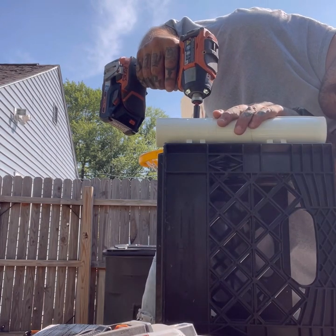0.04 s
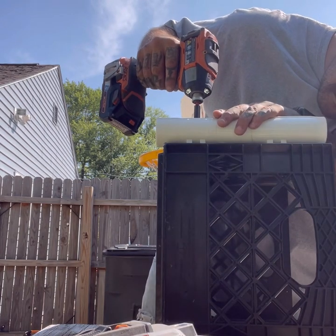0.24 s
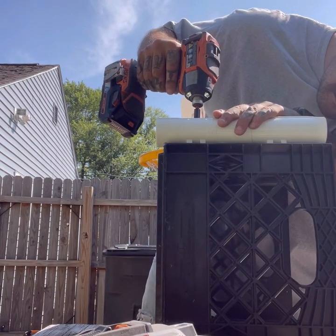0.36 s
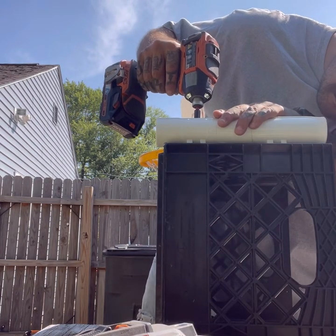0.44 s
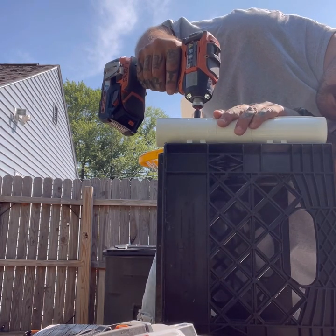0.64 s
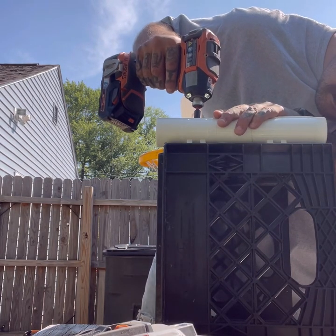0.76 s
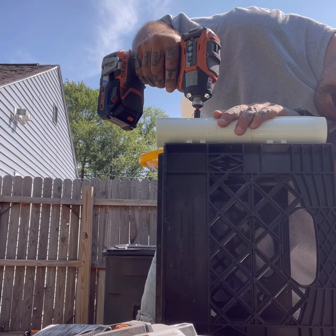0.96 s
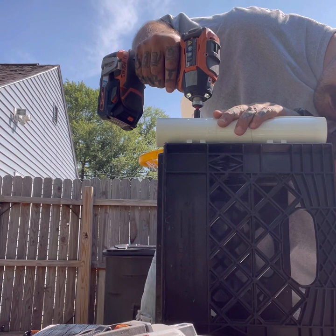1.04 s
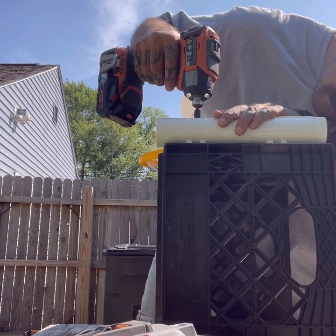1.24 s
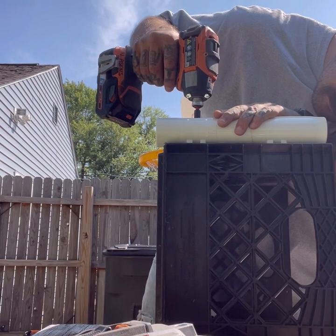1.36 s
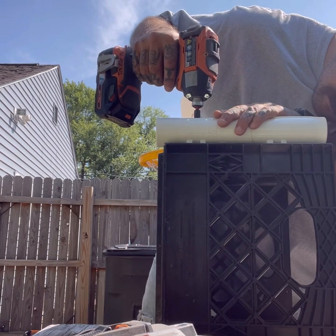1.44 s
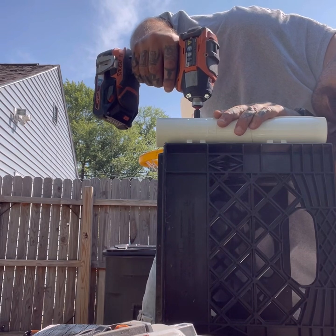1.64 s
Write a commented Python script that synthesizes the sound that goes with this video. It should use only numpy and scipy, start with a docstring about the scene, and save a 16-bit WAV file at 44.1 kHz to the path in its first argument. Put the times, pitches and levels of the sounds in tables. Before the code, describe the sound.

Sharp ticks and knocks of an idle drill's bit on plastic pipe atop a crate.

```python
"""Quick ticks and a short skid on plastic, then two more knocks: the bit of a cordless drill, its
motor off, is set on a plastic pipe lying on an upturned plastic crate in a back yard. Each touch
rings the pipe briefly and runs down into the crate, which thuds under the heavier pushes. Hands rub
faintly. Behind it all are distant traffic, a far machine and a high hiss of insects or leaves."""
import sys
import numpy as np
from scipy import signal
from scipy.io import wavfile

SR = 44100
rng = np.random.default_rng(int(sys.argv[2]) if len(sys.argv) > 2 else 0)


def dump_mix(stems):
    """Bounce the given channels to the path in sys.argv[1] as a 16-bit WAV at rate SR."""
    frames = np.atleast_2d(stems).T  # one column per channel
    limited = np.clip(frames, -1, 1)  # hard clip at full scale
    pcm = np.round(limited * 32767).astype(np.int16)
    wavfile.write(sys.argv[1], SR, pcm)


N = 74970
T = np.arange(N) / SR
RING_T = T[:SR // 4]   # time axis for one short sound

# In all tables, fade_s is the time to die away by 60 dB and pan_db is left level minus right level.
# Tones the pipe rings with: pitch_hz, level_db, fade_s, pan_db
PIPE_TONES = [(2340, -21.5, 0.046, -9), (2521, -3.5, 0.011, 14.5), (2720, 0.5, 0.015, 3.5),
              (3130, -33, 0.056, 21.5)]
# Tones the crate's top rings with: pitch_hz, level_db, fade_s, pan_db
CRATE_TOP_TONES = [(826, -4, 0.054, 3.5), (886.4, -5, 0.055, 5.5), (1009, -16, 0.085, -3),
                   (1269, -2, 0.048, -4), (1414, -28.5, 0.078, 25), (1873, -14.5, 0.046, 4)]
# Which way the background leans: pitch_hz, pan_db
BACKGROUND_PAN = [(60, 1), (350, 6), (2000, -2), (6000, 7), (10000, -4)]
PIPE_RISE_S, CRATE_RISE_S = 0.00067, 0.0003   # how quickly the ringing builds up
PIPE_LAG_S, CRATE_LAG_S = 0.00003, 0.0001   # how much later the right side hears it


def from_db(db):
    """Turn decibels into a number to multiply by."""
    return 10 ** (np.asarray(db) / 20)


def rms_one(x):
    """Scale a signal so that its average strength (rms) is 1."""
    return x / np.sqrt(np.mean(x ** 2) + 1e-20)


def panned(db):
    """Left and right gains that make the left side louder by db."""
    return from_db(np.array([[.5], [-.5]]) * db)


def at_hz(points, hz, column=1):
    """Read a table at any pitch, sliding between its rows."""
    table = np.array(points)
    return np.interp(np.log(hz), np.log(table[:, 0]), table[:, column])


def in_time(rows):
    """Join (time, value) points into a curve with a value at every sample."""
    return np.interp(T, *np.transpose(rows))


def drift(rate_hz):
    """A slow random wobble, about 1 in size."""
    step, warm_up = 40, 2000   # one value every 40 samples; the first 2000 values are skipped
    memory = np.exp(-2 * step * np.pi * rate_hz / SR)
    noise = rng.standard_normal(N // step + warm_up + 2)
    slow = signal.lfilter([1], [1, -2 * memory, memory * memory], noise)[warm_up:]
    return np.interp(np.arange(N) / step, np.arange(len(slow)), rms_one(slow))


def band_pass(x, low_hz, high_hz):
    """Keep mainly the sound between two pitches."""
    return signal.sosfilt(signal.butter(2, [low_hz, high_hz], "band", fs=SR, output="sos"), x)


def bands(size):
    """Yield quarter-octave slices of noise, low to high: centre pitch and two unrelated noises."""
    edges_hz = 22 * 2 ** np.arange(0, 9.6, .25)
    white = rng.standard_normal((3, 2, size))
    for k, (low, high) in enumerate(zip(edges_hz, edges_hz[1:])):
        yield np.sqrt(low * high), band_pass(white[k % 3], low, high)


def add(out, start_s, sound):
    """Mix a stereo sound in at a given time."""
    i = int(start_s * SR)
    out[:, i:i + sound.shape[1]] += sound[:, :N - i]


def heard(lag_s, delay_s=0):
    """Time since a sound reached the left side and, lag_s later, the right."""
    return np.maximum(RING_T - delay_s - np.array([[0], [lag_s]]), 0)


def ring(tones, rise_s, t, stretch=1, cutoff_hz=SR):
    """A struck object: its tones build up fast and die away; a soft touch weakens the high ones."""
    out = 0
    for hz, db, fade_s, pan_db in tones:
        gain = from_db(db + 0.6 * rng.standard_normal())   # no two strikes are quite alike
        gain /= np.sqrt(1 + (hz / cutoff_hz) ** 4)
        fade = np.exp(-np.log(1000) * t / fade_s)
        out = out + gain * panned(pan_db) * fade * np.sin(2 * np.pi * hz * stretch * t)
    return out * (1 - np.exp(-t / rise_s)) ** 2


def swell(hz, peak_s, lag_s, steepness):
    """A low tone that grows until peak_s and fades; more steepness makes it shorter."""
    t = heard(lag_s)
    return (t / peak_s * np.exp(1 - t / peak_s)) ** steepness * np.sin(2 * np.pi * hz * t)


def noise_burst(table, delay_s=0):
    """A short puff of noise in which each band has its own level and fade time."""
    burst, t = 0, RING_T - delay_s
    for hz, noise in bands(len(RING_T)):
        fade = np.exp(-np.log(1000) * np.maximum(t, 0) / at_hz(table, hz, column=2)) * (t > 0)
        burst = burst + from_db(at_hz(table, hz)) * noise * fade / np.sqrt(np.sum(fade ** 2))
    return burst


def through(x, response):
    """Let every sample of x set off its own copy of a short stereo sound."""
    return signal.fftconvolve(x, response, axes=1)[:, :N]


def traffic_and_hiss():
    """Distant traffic low down and insects or leaves high up, as gently wavering noise."""
    # Tone colour of the background: pitch_hz, relative_level_db
    colour = [(25, -20), (40, -17.5), (58, 3.5), (80, -6.5), (110, 4), (165, -11), (280, -12.5),
              (420, -11.5), (700, -16), (1000, -17), (1500, -28), (2200, -30.5), (3100, -23.5), (3700, -35),
              (4700, -10.5), (5500, -25), (6400, -5.5), (7500, -32.5), (9500, -17.5), (11000, -59.5),
              (14000, -46.5)]
    # How alike left and right are: pitch_hz, likeness (1 the same, 0 unrelated, -1 opposite)
    likeness = [(60, 0.74), (450, 0.6), (950, 0.41), (1900, 0.084), (7500, -0.28), (9500, 0.15), (11000, 1)]
    out = 0
    for hz, noise in bands(N + SR // 4):
        middle, side = noise[:, -N:]   # skip the start, where the filter is still settling
        alike = np.clip(at_hz(likeness, hz), -1, 1)
        stereo = np.sqrt(1 + alike) * middle + np.sqrt(1 - alike) * side * [[1], [-1]]
        level_db = at_hz(colour, hz) + 1.4 * drift(rate_hz=2.1)
        out = out + from_db(level_db) * panned(at_hz(BACKGROUND_PAN, hz)) * stereo
    return from_db(-47) * rms_one(out)


def far_machine(pitch_hz=104.4, level_db=-54.5):
    """A far machine hums on one low, slightly unsteady note."""
    hum = np.sin(2 * np.pi * pitch_hz * T + 0.2 * drift(rate_hz=1.9))
    return from_db(level_db) * hum * panned(at_hz(BACKGROUND_PAN, pitch_hz))


def yard_echo(sound):
    """Sound bounces back from the nearby crate, fence and ground."""
    # The blur of close echoes: pitch_hz, level_db, fade_s
    echoes = [(220, -22, .05), (450, -14, .07), (900, -13, .05), (1500, -15, .04), (2500, -14, .03),
              (4500, -4, .03), (13000, -4, .035)]
    return through(sound, noise_burst(echoes, delay_s=0.0028))


def hand_rub():
    """Hands rub faintly on the pipe and the drill."""
    # Loudness of the rubbing: time_s, level_db
    loudness = [(0.0, -63), (0.48, -55), (0.62, -54), (0.74, -68.5), (0.97, -61.5), (1.07, -53),
                (1.2, -53.5), (1.33, -56), (1.52, -61.5), (1.65, -50), (1.7, -63)]
    # Its tone colour: pitch_hz, relative_level_db
    colour = [(100, -20), (400, 3.5), (1100, -10), (1900, -20), (2700, -14.5), (8000, -35), (15000, -78)]
    rub = sum(from_db(at_hz(colour, hz) + 2 * drift(rate_hz=6.7)) * noise[0] for hz, noise in bands(N))
    return from_db(in_time(loudness)) * rms_one(rub)


def deep_rumble():
    """A deep rumble that lingers after the pushes."""
    # Loudness of the rumble: time_s, level_db
    loudness = [(0.0, -53), (0.17, -70.5), (0.25, -45.5), (0.52, -49), (0.62, -70), (1.28, -53.5),
                (1.42, -46.5), (1.55, -50.5), (1.7, -59)]
    rumble = band_pass(rng.standard_normal(N), low_hz=45.4, high_hz=86.4)
    return from_db(in_time(loudness)) * rms_one(rumble)


def crate_thuds():
    """Under a push the crate's top knocks, then the whole crate sways with a low boom."""
    # Heavy pushes that bend the crate: start_s, knock_db, boom_db
    pushes = [(0.225, -29.5, -30.5), (0.478, -24.5, -36), (1.217, -40, -41), (1.363, -15, -23.5)]
    # Low tones of the swaying crate: pitch_hz, level_db, peak_s, right_lag_s
    sway_tones = [(98.4, -5, 0.035, 0.0026), (135.6, -9.5, 0.06, 0.0025), (186.4, -2.5, 0.031, 0.0021),
                  (217.4, -13.5, 0.07, 0.0014)]
    boom = sum(from_db(db) * swell(hz, peak_s, lag_s, steepness=8)
               for hz, db, peak_s, lag_s in sway_tones)
    knock = swell(hz=263, peak_s=0.012, lag_s=0.001627, steepness=18.3)
    out = np.zeros((2, N))
    for start_s, knock_db, boom_db in pushes:
        add(out, start_s, from_db(knock_db) * knock + from_db(boom_db) * boom)
    return out


def tip_skid(slips_per_s=900):
    """The tip drags in tiny random slips: each one scratches and faintly rings pipe and crate."""
    # Strength of the slips: time_s, level_db
    strength = [(0.216, -45), (0.24, -50), (0.305, -40), (0.345, -47.5), (0.365, -52), (0.39, -48),
                (0.425, -42), (0.455, -52.5), (0.485, -44), (0.51, -73)]
    # The dry scratch of one slip: pitch_hz, level_db, fade_s
    scratch_bands = [(400, 14, .02), (900, 27, 0.033), (1510, 40, .012), (2610, -3, .008), (3500, -2, .006),
                     (6500, -12, 0.0054), (9000, -4, .004), (12900, -10, .004)]
    slips = (rng.random((1, N)) < slips_per_s / SR) * rng.choice([-1, 1], N)
    dragging = (T > strength[0][0]) & (T < strength[-1][0])
    scratch = noise_burst(scratch_bands)
    pipe = from_db(0.5) * ring(PIPE_TONES, PIPE_RISE_S, heard(PIPE_LAG_S))
    crate = from_db(-6) * ring(CRATE_TOP_TONES, CRATE_RISE_S, heard(CRATE_LAG_S))
    return through(slips * from_db(in_time(strength)) * dragging, scratch + pipe + crate)


def bit_ticks(usual_pipe_hz=2671):
    """At each touch the bit clicks, the pipe rings and the crate answers a moment later."""
    # The bit touching the pipe: start_s, pipe_db, pipe_pitch_hz, crate_top_db, crate_walls_db,
    # click_db, click_cutoff_hz
    touches = [(0.2248, -2.5, 2634, -18, -24.5, -14, 15900), (0.2541, -17, 2650, -37, -38.5, -31, 5000),
               (0.2658, -17, 2750, -44, -51, -23, 5970), (0.2716, -10.5, 2597, -39, -38, -35, 6860),
               (0.293, -23, 2700, -52, -52, -31, 5000), (0.2972, -16.5, 2570, -49, -50, -24, 6800),
               (0.2997, -13, 2686, -36.5, -46, -23, 5000), (0.3167, -23, 2640, -41, -36, -45, 5000),
               (0.3325, -32, 2500, -42, -60, -41, 5000), (0.3518, -27, 2460, -35, -53, -42, 6000),
               (0.3557, -26, 2660, -63, -45.5, -39, 6000), (0.3983, -24, 2530, -55, -40, -50, 5000),
               (0.4141, -15, 2274, -29.5, -39, -24, 3820), (0.4318, -24.5, 2240, -38, -40.5, -40, 4000),
               (0.4766, -22, 2410, -38, -56, -19.5, 5470), (0.48, -29, 2710, -28, -28.5, -37, 9100),
               (1.2174, -19, 2670, -27, -36, -22, 5000), (1.3614, -12.5, 2636, -23, -24, -22, 5200)]
    # Tones of the bit and the chuck that grips it: pitch_hz, level_db, fade_s, pan_db
    bit_tones = [(3810, -26, 0.045, 1), (4510, -11.5, 0.0044, 18.5), (5833, -11.5, 0.012, 4.5),
                 (7270, -5, 0.0037, 5.5), (10800, -27, 0.0019, -38), (12140, -1, 0.0019, -1)]
    # Tones of the crate's walls: pitch_hz, level_db, fade_s, pan_db
    wall_tones = [(405.5, -18, 0.19, 11), (509, -19.5, 0.15, 10), (627, -9.5, 0.072, -5),
                  (684, -3.5, 0.044, 17)]
    pipe_t = heard(PIPE_LAG_S)
    bit_t = heard(lag_s=0.00001)
    crate_t = heard(CRATE_LAG_S, delay_s=0.00168)
    out = np.zeros((2, N))
    for start_s, pipe_db, pipe_hz, top_db, walls_db, click_db, cutoff_hz in touches:
        pipe = from_db(pipe_db) * ring(PIPE_TONES, PIPE_RISE_S, pipe_t, stretch=pipe_hz / usual_pipe_hz)
        click = from_db(click_db) * ring(bit_tones, rise_s=0.00007, t=bit_t, cutoff_hz=cutoff_hz)
        top = from_db(top_db) * ring(CRATE_TOP_TONES, CRATE_RISE_S, crate_t)
        walls = from_db(walls_db) * ring(wall_tones, CRATE_RISE_S, crate_t)
        add(out, start_s, pipe + click + top + walls)
    return out


def scene():
    """Bit, pipe and crate with their echo, over the quiet sounds of hands and yard."""
    work = bit_ticks() + tip_skid() + crate_thuds()
    echo = yard_echo(work)
    handling = (hand_rub() + deep_rumble()) * panned(5.4)
    return work + echo + handling + traffic_and_hiss() + far_machine()


def record(dry):
    """Cut away the very highest treble."""
    cutoff_hz = 15200
    return signal.sosfilt(signal.ellip(10, .2, 80, cutoff_hz, fs=SR, output="sos"), dry)


dry = scene()
out = record(dry)
dump_mix(out)
```